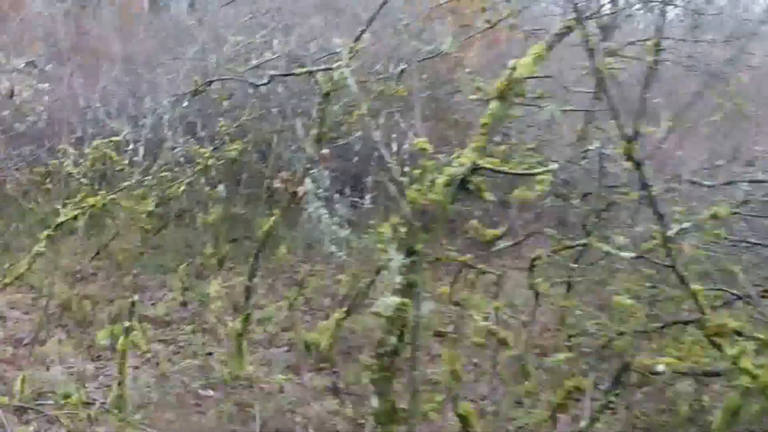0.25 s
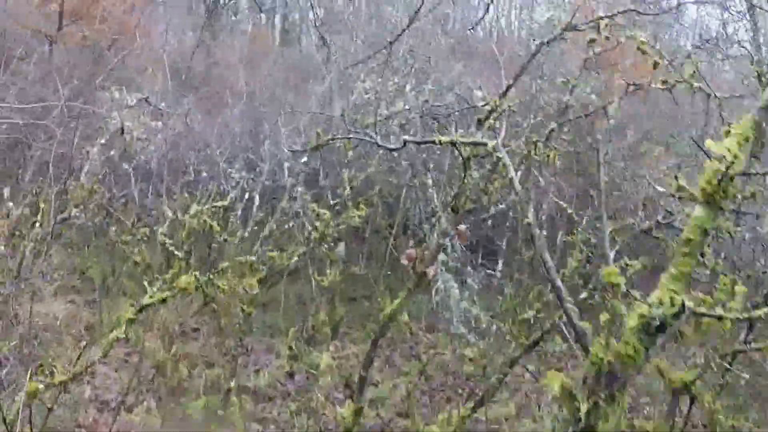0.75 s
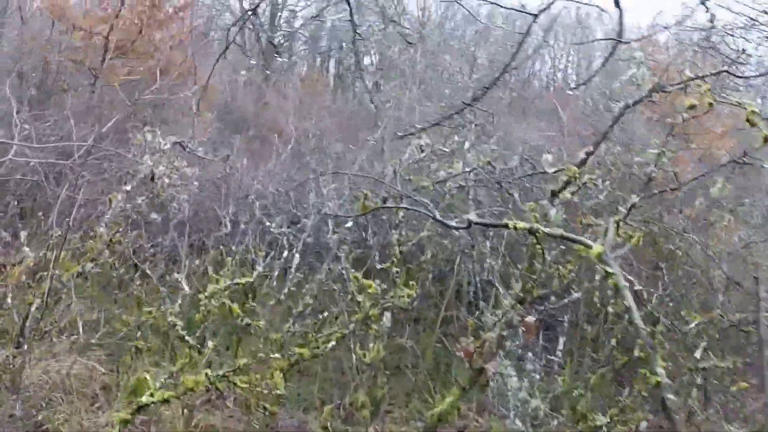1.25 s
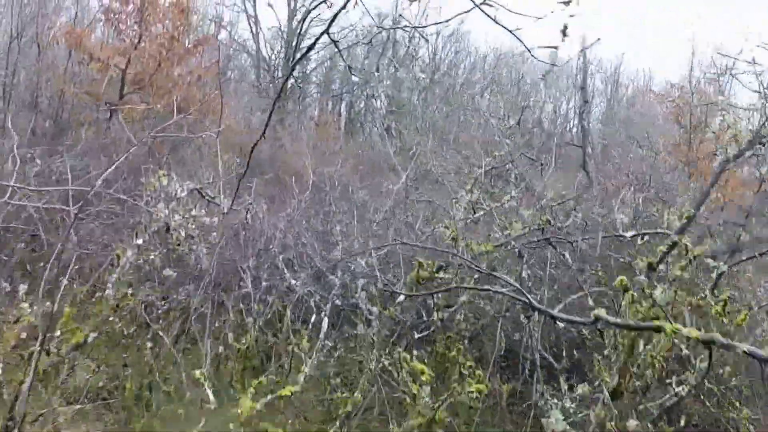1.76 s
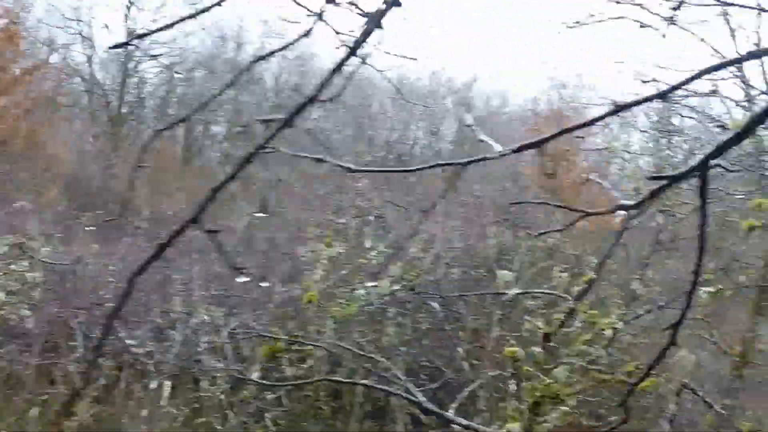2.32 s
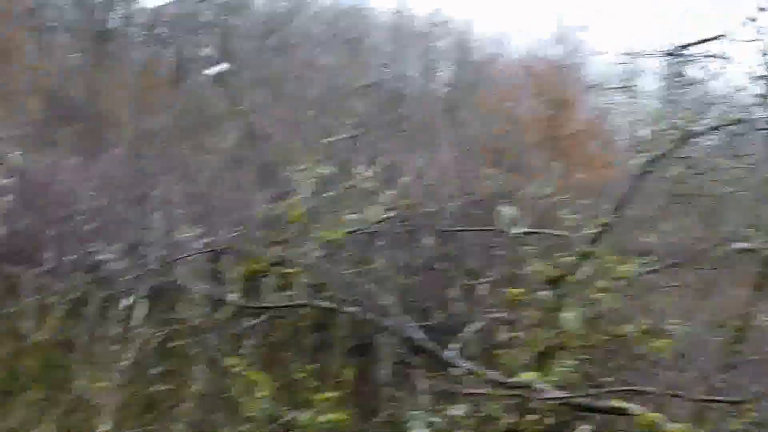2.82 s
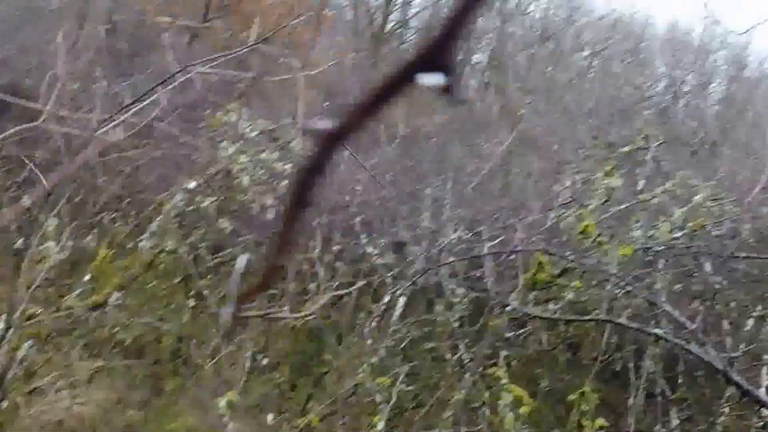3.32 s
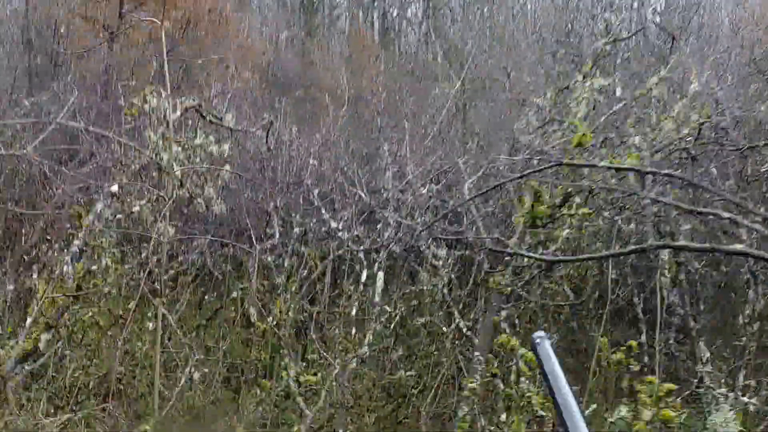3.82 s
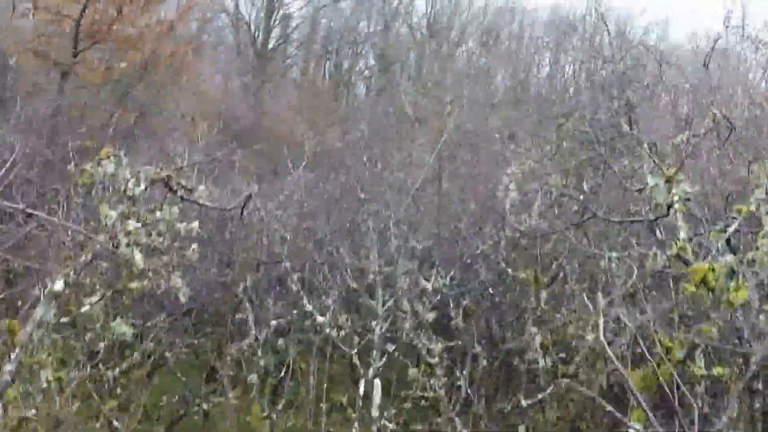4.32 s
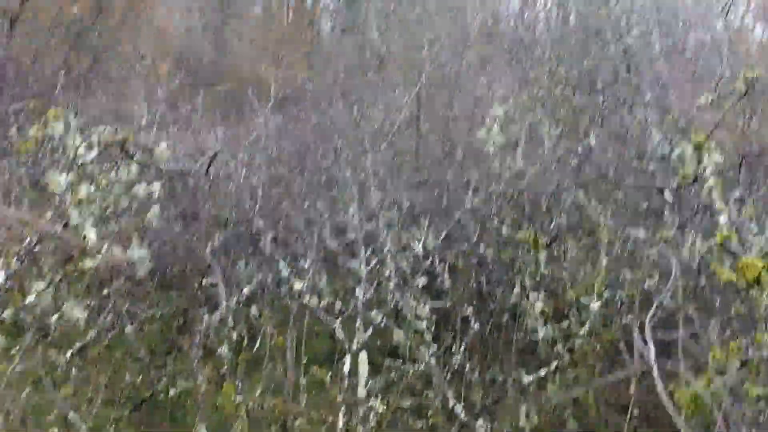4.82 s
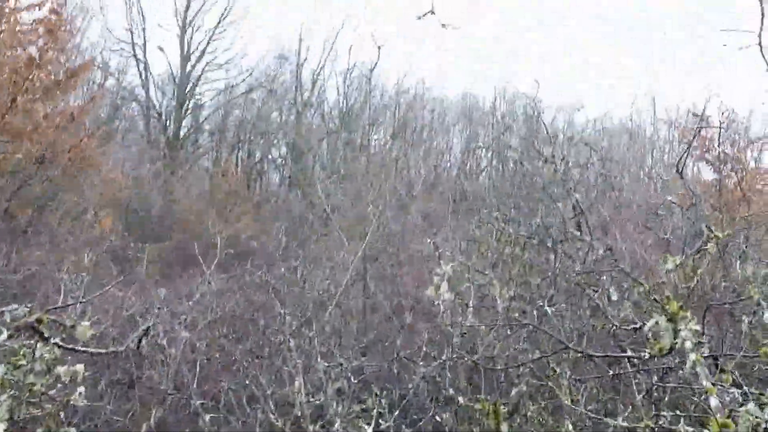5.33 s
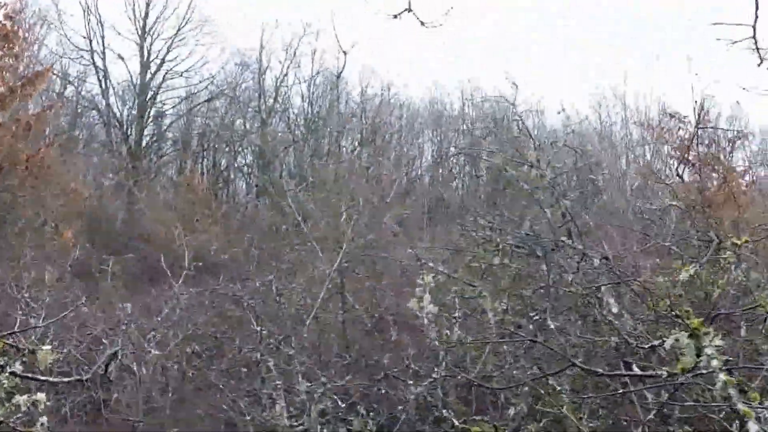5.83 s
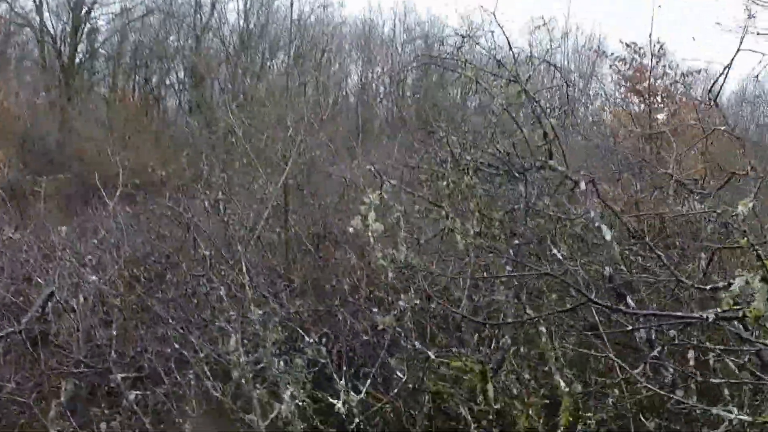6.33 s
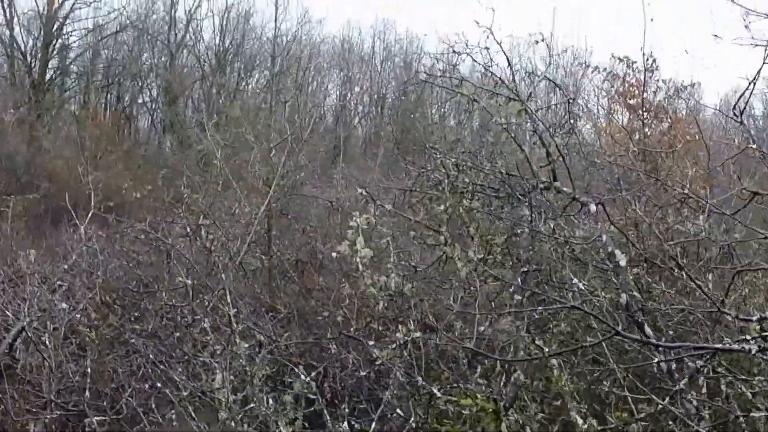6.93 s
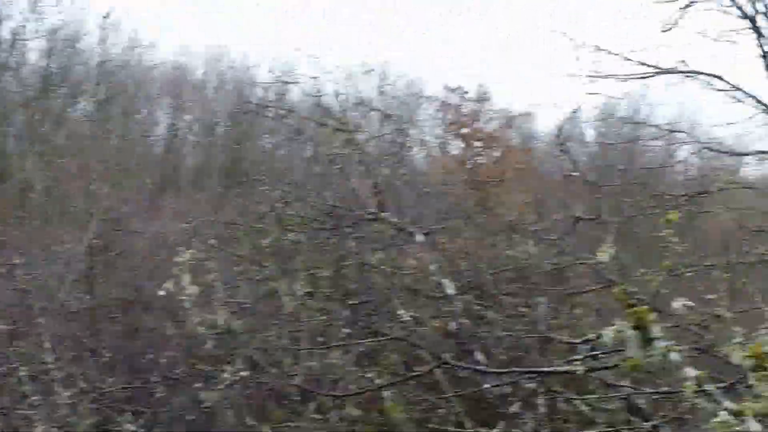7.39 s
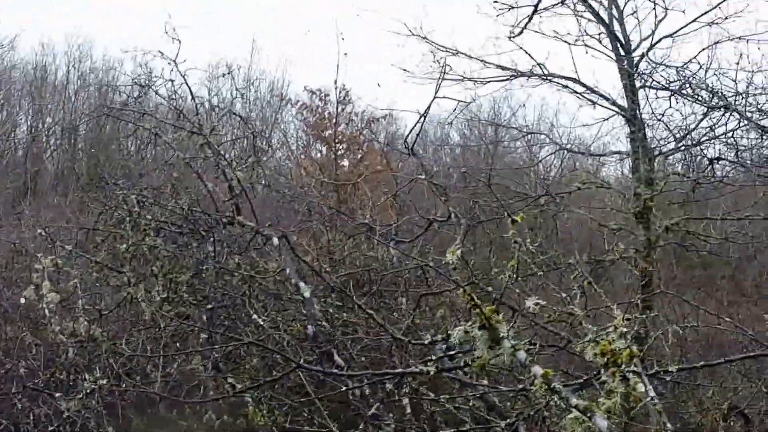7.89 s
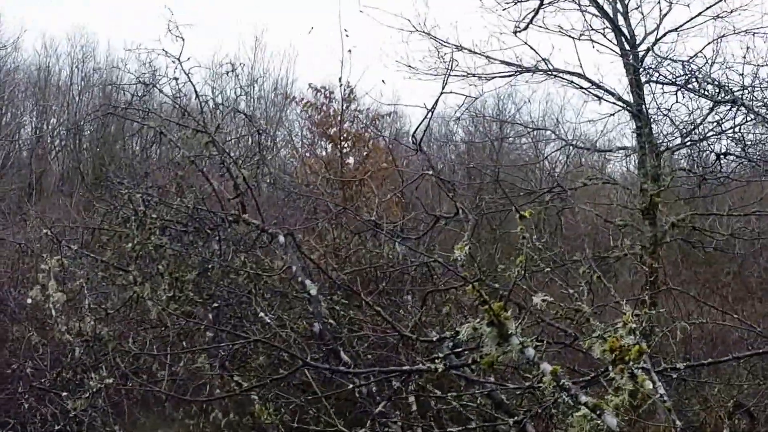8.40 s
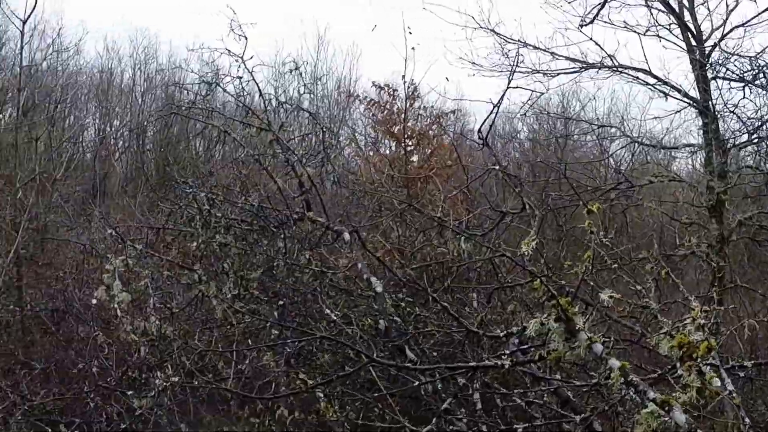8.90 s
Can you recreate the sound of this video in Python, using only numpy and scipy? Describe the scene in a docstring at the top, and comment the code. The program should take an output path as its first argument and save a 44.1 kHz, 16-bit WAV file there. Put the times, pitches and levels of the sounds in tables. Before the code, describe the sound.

Small damped collar bell strokes mix with twig snaps, crackling rustle and low hand rumble in still winter woodland. After two seconds a branch scrapes and thorns rasp on the camera's plastic case; at three and a half it takes a sharp loud whip, then duller bumps. A lower bell jingles faintly further off. Finally the rustle settles and the collar bell rings most busily.

```python
"""Someone pushes through thorny winter scrub with a small camera; a dog's collar bell tinkles nearby.
From the start, short damped bell strokes mix with crackling, snapping twigs and hand rumble over a soft hush.
After 2 s a branch drags along the case and thorns rasp; another whips it at 3.5 s and the hand bumps it at 4 s.
A lower bell, jingling faintly further off, gives clear strokes from 2 s. Past 6.3 s the rustle fades and
the collar bell is at its busiest. Bells and case are decaying modes; the rest is coloured noise and clicks."""
import sys
import numpy as np
from scipy import signal
from scipy.fft import rfft, irfft, next_fast_len
from scipy.io import wavfile

SR = 44100
rng = np.random.default_rng(int(sys.argv[2]) if len(sys.argv) > 2 else 0)


def dump_mix(stems):
    """Bounce the given channels to the path in sys.argv[1] as a 16-bit WAV at rate SR."""
    frames = np.atleast_2d(stems).T  # one column per channel
    limited = np.clip(frames, -1, 1)  # hard clip at full scale
    pcm = np.round(limited * 32767).astype(np.int16)
    wavfile.write(sys.argv[1], SR, pcm)


N = 403508
TIME = np.arange(N) / SR

# colour of dry twigs: (frequency [Hz], level [dB])
TWIG_COLOUR = [(300, -22), (900, -14), (1500, 1), (1800, -1.5), (2400, 5), (3200, 0), (3900, -9.5),
               (5300, -7), (6100, -1), (7200, -10.5), (10000, -15.5), (12000, -13.5), (15000, -28.5)]


def undb(db):
    """Amplitude gain from dB."""
    return 10 ** (np.asarray(db) / 20)


def unit(x):
    """Scale to an rms of 1."""
    return x / np.sqrt(np.mean(x ** 2))


def curve(rows):
    """Join (time [s], value) points by lines."""
    return np.interp(TIME, *np.transpose(rows))


def add(out, start_s, x):
    """Mix a short sound in at a time, in place."""
    part = out[int(start_s * SR):][:len(x)]
    part += x[:len(part)]


def colour(x, points, tilt_db=0):
    """Causal minimum-phase filter from (frequency [Hz], level [dB]) points, tilted in dB per octave."""
    size = next_fast_len(len(x) + 4096, True)
    size += size % 2
    octave = np.log2(np.maximum(np.arange(size // 2 + 1) * SR / size, 1))
    hz, db = np.transpose(points)
    point_octave = np.log2(hz)
    from_centre = np.clip(octave, point_octave[0], point_octave[-1]) - point_octave.mean()
    gain_db = np.interp(octave, point_octave, db) + tilt_db * from_centre
    # folding the cepstrum onto positive times gives minimum phase
    cepstrum = irfft(np.log(undb(gain_db)))
    cepstrum[1:size // 2] *= 2
    cepstrum[size // 2 + 1:] = 0
    return irfft(rfft(x, size) * np.exp(rfft(cepstrum)))[:len(x)]


def walk(knots_per_s):
    """Slow random wandering with an rms of 1."""
    knots = rng.standard_normal(2000)
    return unit(np.interp(TIME * knots_per_s, np.arange(len(knots)), knots))


def ring(modes, scatter_db, detune, size=15000):
    """Decaying modes; each blow lands elsewhere and shares its energy differently."""
    hz, db, t60_s = np.transpose(modes)[:, :, None]
    t = TIME[:size]
    strength, pitch = rng.standard_normal((2, len(modes), 1))
    tones = np.sin(2 * np.pi * hz * (1 + detune * pitch) * t)
    decays = np.exp(-np.log(1000) * t / t60_s)
    return np.sum(undb(db + scatter_db * strength) * tones * decays, axis=0)


def burst(t60_s, size=2000):
    """A dying puff of noise."""
    return rng.standard_normal(size) * np.exp(-np.log(1000) * TIME[:size] / t60_s)


def clicks(per_s, spread_db):
    """Random clicks of uneven size and either sign."""
    chance, size = rng.random(N), rng.standard_normal(N)
    hits = chance < per_s / SR
    return hits * undb(spread_db * np.clip(size, -2, 2)) * rng.choice([-1, 1], N)


def swells(rows, attack_s, release_s, sag_db_per_s=0):
    """Summed gain of (start [s], length [s], level [dB]) gestures: each rises, sags while held and dies away."""
    power = np.zeros(N)
    for start_s, length_s, db in rows:
        rise = np.clip(1 + (TIME - start_s) / attack_s, 0, 1)  # complete at start_s
        hold = undb(db - sag_db_per_s * np.clip(TIME - start_s, 0, length_s))
        fall = np.exp(-np.maximum(TIME - start_s - length_s, 0) / release_s)
        power += (rise * hold * fall) ** 2
    return np.sqrt(power)


def woodland_air(level_db=-58.5, wander_db=0.4):
    """Still woodland air: a soft, nearly even hush of coloured noise."""
    # (frequency [Hz], level [dB])
    air_colour = [(90, -4), (170, -7), (350, -10.5), (600, -13.5), (850, -15.5), (1350, -18.5),
                  (1600, -15.5), (1850, -20.5), (2600, -24), (4000, -25.5), (6100, -30.5), (9000, -36),
                  (12500, -41), (15000, -47.5)]
    hush = unit(colour(rng.standard_normal(N), air_colour))
    return hush * undb(level_db + wander_db * walk(knots_per_s=2.9))


def hand_rumble(trim_db=-1):
    """The hand rumbles on the camera, most when the grip shifts: low noise under a moving level."""
    # (frequency [Hz], level [dB])
    rumble_colour = [(12, -6.5), (28, 1.5), (45, -1), (70, -6.5), (95, -22.5), (130, -30), (200, -32.5),
                     (400, -51), (2000, -110)]
    # restlessness between shifts: (time [s], level before trim [dB])
    unrest = [(0, -46), (1.3, -55.5), (2.3, -50.5), (3.25, -52.5), (4.2, -44.5), (5.1, -47.5), (6.5, -55.5),
              (7.6, -55), (8.6, -66.5), (9.15, -63.5)]
    # grip shifts: (start [s], length [s], level before trim [dB])
    shifts = [(.04, 0.21, -48.5), (.85, 0.18, -44), (1.62, 0.089, -39.5), (2.48, 0.45, -43.5),
              (3.03, .06, -46.5), (4.62, .2, -38.5), (5.88, 0.065, -40), (6.08, 0.044, -39)]
    effort = np.hypot(undb(curve(unrest)), swells(shifts, attack_s=0.082, release_s=0.021))
    return unit(colour(rng.standard_normal(N), rumble_colour)) * effort * undb(trim_db)


def rustle(crackle_db=-2.5, swish_db=2.0):
    """Stems tick against each other and swish over clothing with every push."""
    # pushes through the brush: (start [s], length [s], level before mix [dB])
    pushes = [(.02, 0.32, -63), (.79, 0.034, -61.5), (.9, 0.072, -61), (1.66, 0.15, -67.5),
              (1.91, 0.33, -66), (2.78, .18, -68.5), (3.92, 0.33, -68), (4.42, 0.13, -70),
              (4.58, 0.24, -70.5), (4.97, 0.42, -64.5), (5.29, 0.055, -61.5), (5.58, 0.023, -68.5),
              (5.725, 0.045, -66), (5.89, 0.28, -67)]
    stir_db, settles_s, settle_db_per_s = -71, 6.3, 3
    ticks = signal.fftconvolve(clicks(per_s=280, spread_db=3.5), burst(t60_s=0.005))[:N]
    crackle = unit(colour(clicks(per_s=180, spread_db=3.5), TWIG_COLOUR, tilt_db=-1.9))
    brushing = rng.standard_normal(N) + unit(ticks)
    swish = unit(colour(brushing * undb(2 * walk(knots_per_s=23)), TWIG_COLOUR, tilt_db=-1.0))
    # the brush keeps stirring between pushes, then settles as the walker slows down
    stir = undb(stir_db - settle_db_per_s * np.maximum(TIME - settles_s, 0))
    effort = np.hypot(stir, swells(pushes, attack_s=0.086, release_s=0.055, sag_db_per_s=7.5))
    return effort * (undb(crackle_db) * crackle + undb(swish_db) * swish)


def twigs(trim_db=-1, splinter_db=-12):
    """Each snap is one sharp fracture with a spray of splintering fibres."""
    # (time [s], peak before trim [dB], brightness [dB per octave])
    snaps = [(.034, -38, -3), (.143, -44, 9), (.236, -38, 0.5), (.8787, -32, -1.5), (.898, -37, -4),
             (.914, -46, 3), (.935, -39, 3), (0.972, -41, 0), (1.031, -42.5, 0.5), (1.677, -39, 0),
             (1.714, -42.5, 1), (1.922, -40.5, 0), (2.011, -42.5, 4.5), (2.107, -42, -5), (4.204, -41.5, 4),
             (4.224, -43, 7), (4.983, -39, -2), (5.043, -34.5, -0.5), (5.104, -27, -3), (5.138, -41, 2),
             (5.170, -37.5, 3), (5.199, -38.5, 7), (5.336, -36, 1), (5.6084, -32.5, -8), (5.75, -39, -1),
             (7.816, -29.5, 0), (7.894, -47.5, 2)]
    out = np.zeros(N)
    for s, db, bright in snaps:
        crack = undb(splinter_db) * burst(t60_s=0.021)
        crack[0] += 1
        crack = colour(crack, TWIG_COLOUR, tilt_db=bright)
        add(out, s, undb(db + trim_db) * crack / np.abs(crack).max())
    return out


def branch_rub(dull_hz=2800, groan_db=-7, groan_hz=790, groan_t60_s=0.016):
    """Bark sticks and slips on the case in dense tiny jerks that make its wall groan."""
    # bark rubbing on the case: (frequency [Hz], level [dB])
    rub_colour = [(150, -8), (350, -20), (560, -28), (780, -20), (1000, -12.5), (1270, -0.5), (1550, 2.5),
                  (1870, -6), (2150, -0.5), (2800, -13.5), (3700, -23.5), (4400, -21), (6000, -22),
                  (8500, -38), (15000, -51)]
    # slides along the case: (start [s], length [s], level [dB], share of gritty treble [0-1])
    slides = [(2.225, .085, -51, 0), (2.326, 0.1, -38, 0), (2.45, 0.018, -37.5, 0.05),
              (2.502, 0.069, -34.5, 1), (2.599, 0.067, -36.5, 0.7), (2.762, 0.04, -56.5, 1)]
    jerks = clicks(per_s=5000, spread_db=5.0) * undb(2.0 * walk(knots_per_s=210))
    rough = unit(colour(jerks, rub_colour))
    wall = ring([(groan_hz, 0, groan_t60_s)], scatter_db=0, detune=0)
    groan = unit(signal.fftconvolve(jerks, wall)[:N])
    # smooth bark rubs dully with the groan, rough bark adds the treble
    lowpass = signal.butter(2, dull_hz, fs=SR, output="sos")
    dull = signal.sosfiltfilt(lowpass, rough) + undb(groan_db) * groan
    out = np.zeros(N)
    for start_s, length_s, db, grit in slides:
        pressure = swells([(start_s, length_s, db)], attack_s=0.019, release_s=0.015, sag_db_per_s=25)
        out += pressure * (dull + np.clip(grit, 0, 1) * (rough - dull))
    return out


def thorn_rasps(trim_db=9, t60_s=0.03):
    """Thorns catch on the case in short rasps of coloured noise."""
    # (frequency [Hz], level [dB])
    thorn_colour = [(200, -6), (400, -15), (560, -16), (820, 3), (980, -12), (1300, 0.5), (1800, -6),
                    (2350, 7), (3450, -19), (3900, -1), (4120, -9), (4450, -1), (5000, -7), (5600, -21),
                    (6800, -22.5), (7450, -20), (10000, -37.5)]
    # (time [s], level before trim [dB])
    catches = [(2.3205, -30), (2.327, -31), (2.341, -24.5), (2.351, -25), (2.364, -38), (2.375, -29.5),
               (2.385, -36), (2.397, -26.5), (2.405, -26.5), (2.415, -33), (2.424, -34.5)]
    rasps = np.zeros(N)
    for s, db in catches:
        add(rasps, s, undb(db + trim_db) * burst(t60_s))
    return colour(rasps, thorn_colour)


def branch_judder():
    """The branch judders against the hand: a swell of low noise."""
    # (frequency [Hz], level [dB])
    bough_colour = [(40, -17), (90, -3), (165, 0), (240, -10), (400, -22.5), (1000, -54.5)]
    # (start [s], length [s], level [dB])
    judders = [(2.27, 0.38, -49)]
    noise = unit(colour(rng.standard_normal(N), bough_colour))
    return noise * swells(judders, attack_s=0.11, release_s=0.15)


def case_knocks(grit_db=-29, rise_s=0.00078, soft_hz=1500):
    """Blows ring the plastic case, duller and rougher the softer the contact."""
    # (time [s], level [dB], contact cut-off [Hz])
    blows = [(2.32, -13.5, 2840), (2.3216, -13.5, 1840), (2.5045, -23, 3000), (2.5945, -30, 3020),
             (3.5254, 6, 12100), (3.5317, -15, 13700), (3.955, -32, 1800), (3.9601, -23.5, 2400),
             (3.9631, -16.5, 1440), (3.9775, -14.5, 1700), (3.9817, -14, 2330), (3.986, -21.5, 2000),
             (3.9908, -17, 1930), (4.193, -34.5, 1470)]
    # case modes: (frequency [Hz], level [dB], t60 [s])
    case_modes = [(756, -27, 0.021), (1630, -9, 0.019), (1800, -3.5, 0.015), (1847, -27.5, 0.12),
                  (1927, -22, 0.046), (2020, -16.5, 0.015), (2545, -15, 0.02), (3045, -3, 0.0074),
                  (6500, -27, 0.011), (9310, -13.5, 0.0033), (11550, -25.5, 0.00474)]
    # low modes of the case wall: (frequency [Hz], level [dB], t60 [s])
    wall_modes = [(174.3, -14.5, .035), (302, -17, 0.018), (480, -14.5, .016), (778, -7.5, 0.022),
                  (1028, -18, .02)]
    out = np.zeros(N)
    for s, db, contact_hz in blows:
        body = ring(case_modes, scatter_db=1.1, detune=0.001)
        body *= 1 - np.exp(-TIME[:len(body)] / rise_s)
        softness = min(soft_hz / contact_hz, 1)
        # a soft blow slides on for a moment
        slide = burst(t60_s=0.015)
        slide /= np.sqrt(np.sum(slide ** 2))
        blow = body + softness ** 2 * signal.fftconvolve(body, slide)[:len(body)]
        add(blow, 0, undb(grit_db) * burst(t60_s=0.0035))
        # the small case radiates little bass, except where a soft blow flexes its wall
        band_hz = [800, np.clip(contact_hz, 1300, SR / 2 - 1000)]
        contact = signal.butter(2, band_hz, "bandpass", fs=SR, output="sos")
        flex = softness ** 1.8 * ring(wall_modes, scatter_db=4.0, detune=0.05)
        add(out, s, undb(db) * (signal.sosfilt(contact, blow) + flex))
    return out


def low_thuds():
    """Dull thuds, one decaying low mode each: jolts through the grip, and the low ring of the case wall under
    some blows."""
    # (time [s], level [dB], frequency [Hz], t60 [s])
    thuds = [(1.659, -36, 55.7, 0.25), (2.004, -35.5, 112, 0.17), (2.005, -31.5, 296, 0.011),
             (2.487, -28.5, 78.8, 0.49), (2.688, -29, 77.4, 0.2), (3.526, -21, 251.2, 0.027),
             (3.53, -12.5, 63, 0.079), (3.958, -17, 265, 0.0099), (3.9723, -16.5, 117, 0.075),
             (3.983, -23, 181, 0.073), (4.209, -35, 333, 0.024), (4.345, -32.5, 102, 0.067),
             (4.6, -30, 31.4, 0.46), (6.086, -31, 64.3, 0.23)]
    out = np.zeros(N)
    for s, db, hz, t60_s in thuds:
        add(out, s, -ring([(hz, db, t60_s)], scatter_db=1, detune=0))
    return out


def far_bell(trim_db=-6.0, rise_s=0.0033):
    """A lower bell far off: some clear modal strokes over a blur of faint ones."""
    # clear strokes: (time [s], level before trim [dB])
    far_strokes = [(1.9739, -51), (2.96, -47), (3.4416, -48.5), (4.0973, -48.5), (4.805, -47),
                   (5.2946, -46), (5.612, -48), (6.611, -50.5), (6.835, -51), (6.9265, -43), (7.297, -49),
                   (7.371, -48), (7.437, -46.5), (7.5907, -45), (7.647, -51), (7.891, -47), (7.986, -50),
                   (8.1349, -45.5), (8.3997, -50)]
    # (frequency [Hz], level [dB], t60 [s])
    far_modes = [(1534, 5, 0.073), (1625, -2, 0.24), (3880, -22.5, .12), (6410, -14.5, 0.12),
                 (7140, -24, 0.16), (10870, -32, 0.15)]
    # faint jingling as it comes and goes: (time [s], level [dB])
    jingle = [(0, -75), (1.4, -80), (2, -65), (3.2, -74), (4.2, -69), (5.2, -67.5), (6.4, -68), (8.2, -72),
              (9.15, -74)]
    out = np.zeros(N)
    for s, db in far_strokes:
        tone = ring(far_modes, scatter_db=1.0, detune=0.0051)
        tone *= 1 - np.exp(-TIME[:len(tone)] / rise_s)
        add(out, s, undb(db + trim_db) * tone)
    faint = clicks(per_s=70, spread_db=2)
    blur = signal.fftconvolve(faint, ring(far_modes[:2], scatter_db=4.5, detune=0))[:N]
    return out + unit(blur) * undb(curve(jingle))


def collar_bell(high_db=-3.5, top_db=-3, tick_db=-1, bounce_db=-12, rise_s=0.0013):
    """The clapper strikes a small sheet-metal bell; fur and collar damp its modes quickly."""
    # clear strokes: (time [s], level of low modes [dB], level of rim modes before group trims [dB])
    strokes = [(.0544, -67, -58.5), (.1511, -70, -62.5), (.1695, -39, -59), (.4539, -50.5, -82),
               (.5575, -48, -71), (.631, -39, -62), (.6554, -42.5, -64), (.9248, -46.5, -70),
               (1.5718, -47, -76), (1.62, -56, -62), (1.7604, -53, -77), (2.8459, -53.5, -82),
               (2.963, -55, -78), (3.3393, -47, -76.5), (3.6641, -54, -77), (4.2877, -52.5, -77),
               (4.5136, -49, -78), (4.7222, -50, -75), (4.9756, -56, -65), (5.096, -43.5, -73),
               (5.3552, -40.5, -73), (5.3914, -45, -79), (5.5857, -45.5, -69), (6.0896, -58, -62.5),
               (6.2164, -62, -57.5), (6.2662, -50.5, -71), (6.3155, -54, -70), (6.514, -40.5, -57),
               (6.7365, -44.5, -59.5), (6.9341, -50, -70), (7.2305, -41, -64.5), (7.2604, -41, -62),
               (7.4834, -51.5, -71), (7.5368, -39.5, -68), (7.5524, -59, -76), (7.8027, -31, -59),
               (7.9675, -45, -61), (8.035, -33.5, -52.5), (8.096, -44, -65), (8.1309, -45.5, -69.5),
               (8.329, -50.5, -65.5), (8.3759, -47, -64), (8.6, -51.5, -63), (8.6358, -48, -69),
               (8.7495, -65, -65), (9.0229, -51, -64.5), (9.0744, -61, -63.5)]
    # modes, grouped as they are struck: (frequency [Hz], level [dB], t60 [s])
    low_modes = [(2061, 3, 0.086), (2133, -8.5, 0.065), (2480, -7, 0.0165)]
    middle_modes = [(4785, -1, 0.14), (4930, -10, 0.21), (3326, -19, .15), (6024, -10, 0.14)]
    high_modes = [(8730, 1, 0.15), (8820, -1.5, 0.29)]
    top_modes = [(10650, -8, .07), (11120, -1, 0.07), (12250, 0, 0.064), (13500, -12.5, 0.12),
                 (14300, -18, .06)]
    # faint touches of the clapper between the clear strokes
    stray_per_s, stray_db, stray_rim_db = 2.2, -59, -78.5
    stray_s = np.cumsum(rng.exponential(1, size=100)) / stray_per_s
    strays = [(s, stray_db, stray_rim_db) for s in stray_s if s < TIME[-1]]
    out = np.zeros(N)
    for s, low, rim in strokes + strays:
        tone = undb(low) * ring(low_modes, scatter_db=0.5, detune=0.003)
        tone += undb(rim) * ring(middle_modes, scatter_db=5.5, detune=0.0021)
        tone += undb(rim + high_db) * ring(high_modes, scatter_db=3.0, detune=0.0026)
        tone += undb(rim + top_db) * ring(top_modes, scatter_db=0.5, detune=0.0013)
        tone *= 1 - np.exp(-TIME[:len(tone)] / rise_s)
        # strokes that wake the rim modes also tick
        tick = colour(burst(t60_s=0.012), TWIG_COLOUR, tilt_db=5)
        add(tone, 0, undb(rim + tick_db) * tick)
        add(out, s, tone)
        # the clapper bounces and touches once more
        add(out, s + rng.uniform(0.013, 0.026), undb(bounce_db) * tone)
    return out


def scene(woods_db=-23, woods_t60_s=0.47):
    """Bells, twigs and rustle scatter faintly off the trunks; air and sounds on the case stay dry."""
    outdoors = rustle() + twigs() + far_bell() + collar_bell()
    trunks = burst(woods_t60_s, size=40000)
    trunks /= np.sqrt(np.sum(trunks ** 2))
    echo = signal.fftconvolve(outdoors, trunks)[:N]
    background = woodland_air() + hand_rumble()
    on_case = branch_rub() + thorn_rasps() + branch_judder() + case_knocks() + low_thuds()
    return (background + on_case + outdoors + undb(woods_db) * echo)[None]


def record(dry, top_hz=15300):
    """The hardest blow overloads the microphone, which rounds its peaks; the top is cut."""
    rounded = dry / (1 + dry ** 4) ** 0.25
    lowpass = signal.ellip(8, 0.2, 70, top_hz, fs=SR, output="sos")
    return signal.sosfilt(lowpass, rounded)


dry = scene()
out = record(dry)
dump_mix(out)
```